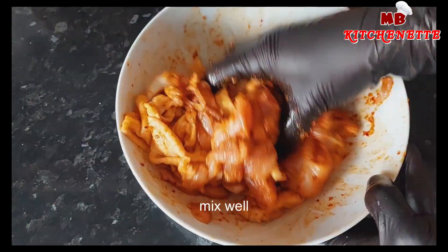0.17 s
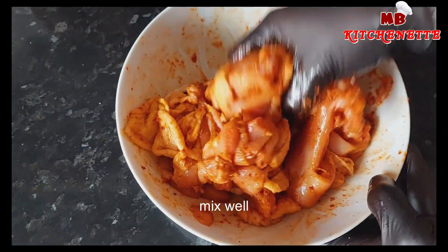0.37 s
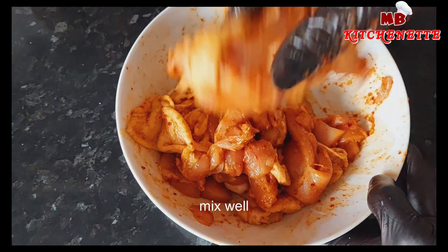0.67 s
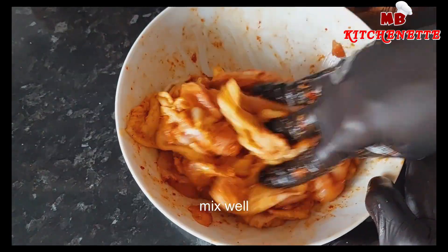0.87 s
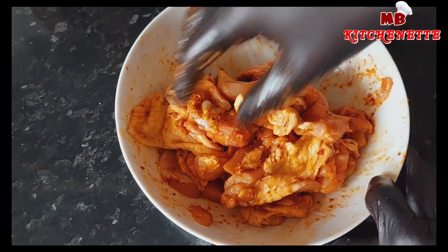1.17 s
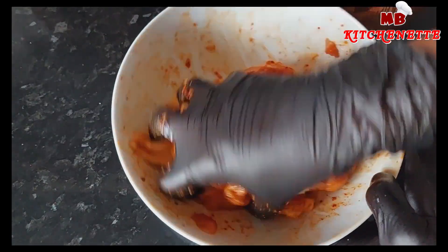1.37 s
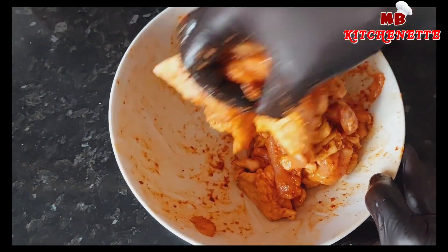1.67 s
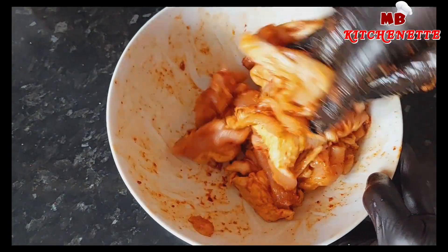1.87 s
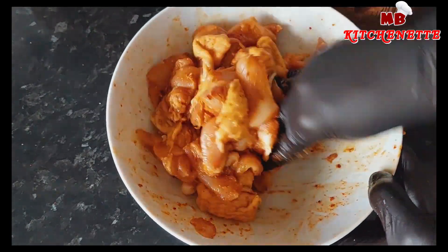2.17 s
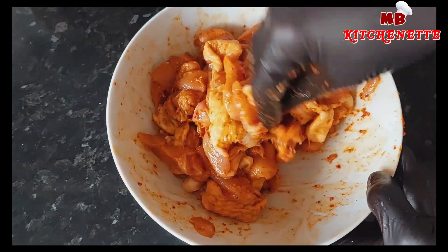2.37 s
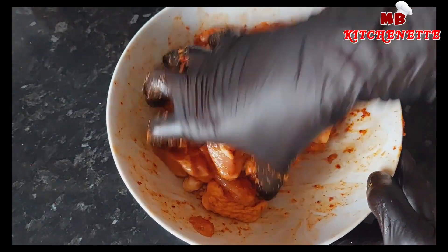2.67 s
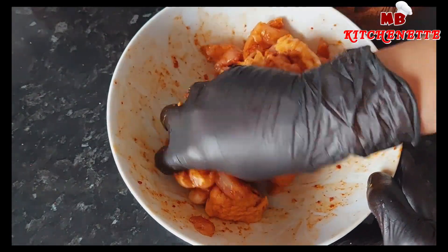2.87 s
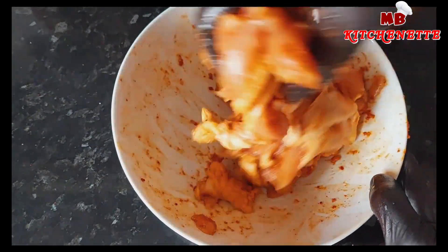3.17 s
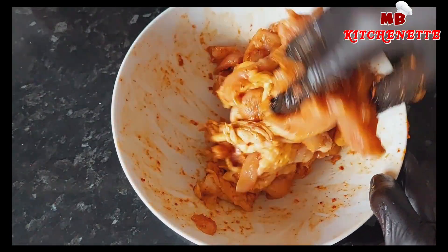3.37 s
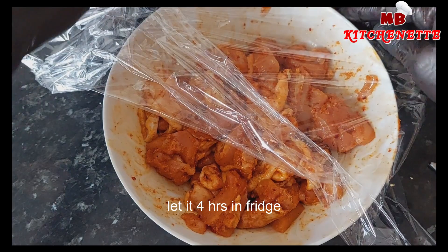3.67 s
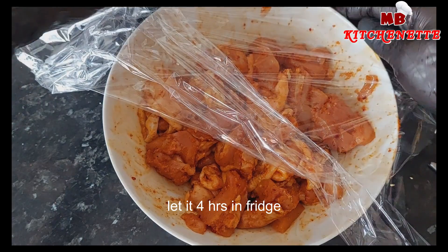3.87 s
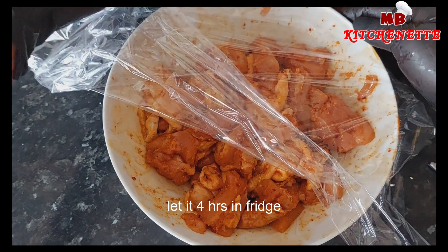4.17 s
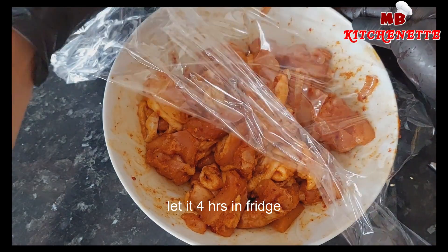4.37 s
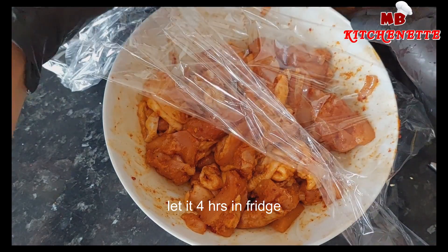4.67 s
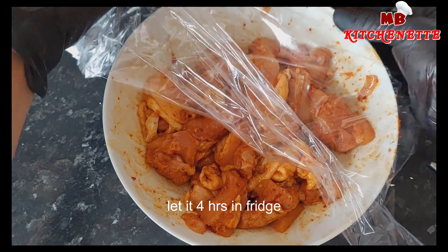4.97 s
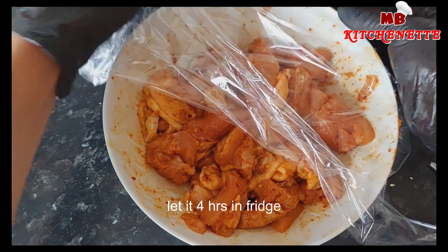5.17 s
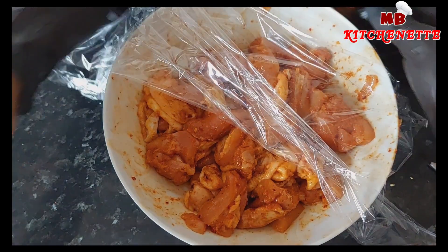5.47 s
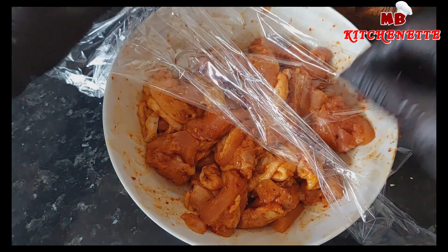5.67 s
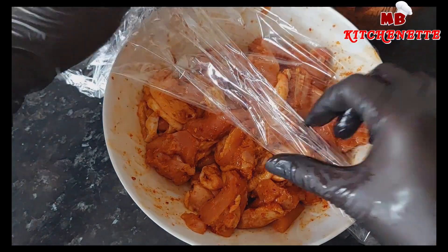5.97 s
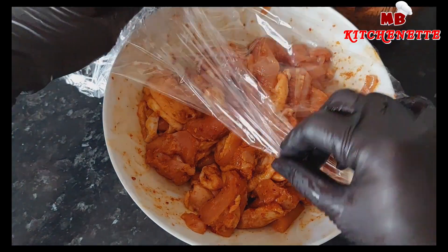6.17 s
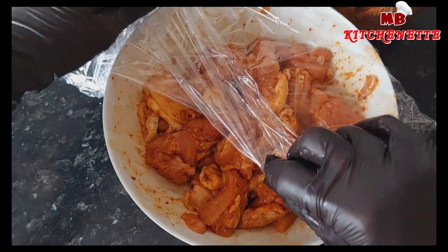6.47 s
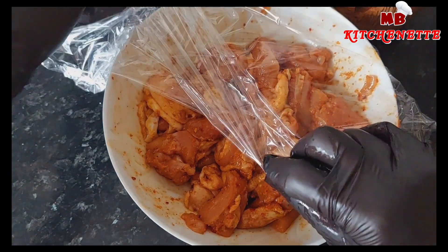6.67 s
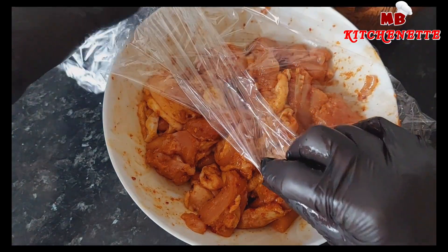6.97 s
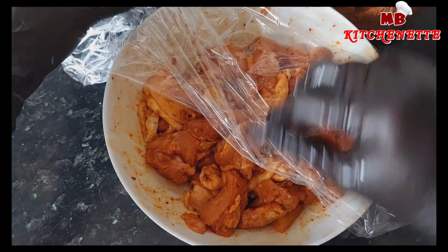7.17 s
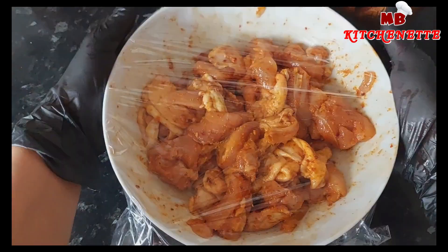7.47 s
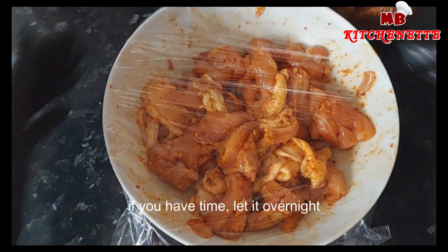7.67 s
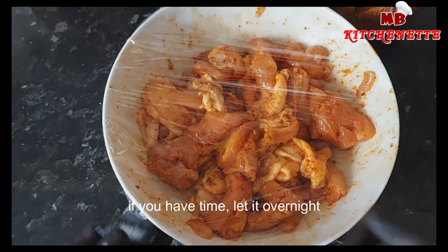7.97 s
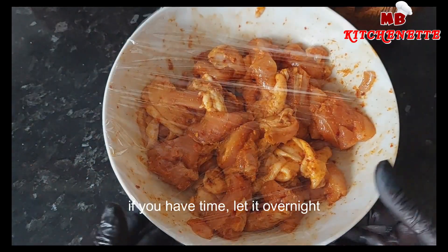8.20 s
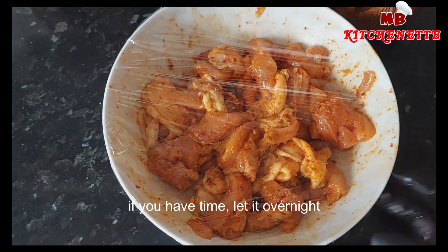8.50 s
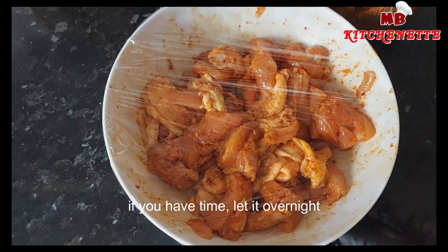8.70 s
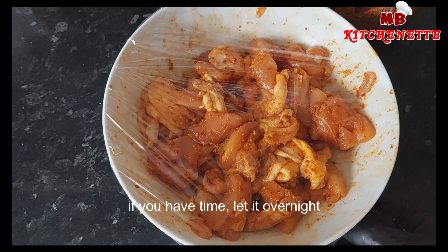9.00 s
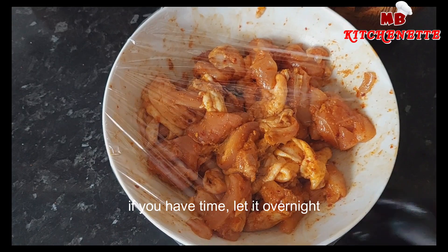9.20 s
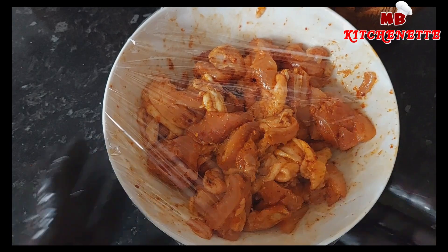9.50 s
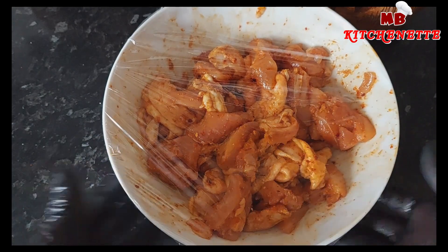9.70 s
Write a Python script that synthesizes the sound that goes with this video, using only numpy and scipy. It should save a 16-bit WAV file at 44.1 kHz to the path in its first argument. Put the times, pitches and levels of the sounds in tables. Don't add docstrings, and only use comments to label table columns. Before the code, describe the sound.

Gloved hands squelch and slap sticky raw meat in a bowl, then thin plastic film crackles sharply as it is pulled over and smoothed down.

```python
import sys
import numpy as np
from scipy import signal
from scipy.fft import rfft, irfft, next_fast_len
from scipy.io import wavfile
from scipy.ndimage import uniform_filter1d, map_coordinates

SR = 44100
rng = np.random.default_rng(int(sys.argv[2]) if len(sys.argv) > 2 else 0)


def rack_gain(trim_db):
    fader = np.asarray(trim_db, float)
    return 10 ** (fader / 20)


def transcribe(signal):
    frames = np.atleast_2d(signal).T
    limited = np.clip(frames, -1, 1)
    pcm = np.round(limited * 32767).astype(np.int16)
    wavfile.write(sys.argv[1], SR, pcm)


N = 433944
FILM_ON = 3.47

# time in seconds, spikiness in dB, level of fine rustle against the pops [ratio].
TEXTURE = [
    (0, 2, 0.42),
    (3.4, 3.5, 0.91),
    (3.6, 5, 1),
    (6.4, 1, 0.69),
    (7.3, 1.5, 1),
    (9.84, 2, 1),
]


def unit(x):
    return x / np.sqrt(np.mean(x ** 2) + 1e-20)


def along(points, hz):
    f, v = np.transpose(points)
    return np.interp(np.log(hz + 1), np.log(f + 1), v)


def curves(rows):
    s, *cols = np.transpose(rows)
    return [np.interp(np.arange(N) / SR, s, c) for c in cols]


def filtered(x, response):
    m = next_fast_len(N + 8192)
    return irfft(rfft(x, m) * response(np.fft.rfftfreq(m, 1 / SR)), m)[..., :N]


def modes(table):
    def response(f):
        total = 0
        for k, (centre, width, db) in enumerate(table):
            damping = 1j * f * width
            total = total + (-1) ** k * rack_gain(db) * damping / (centre ** 2 - f ** 2 + damping)
        return total
    return response


def noise(spectrum, alike):
    a, b = filtered(rng.standard_normal((2, N)), lambda hz: rack_gain(along(spectrum, hz)))
    turn = np.arccos(np.clip(alike, -1, 1)) / 2
    left = np.cos(turn) * a + np.sin(turn) * b
    right = np.cos(turn) * a - np.sin(turn) * b
    return unit(np.array([left, right]))


def patchy(x, depth_db):
    z = signal.stft(x, nperseg=256)[2]
    field = uniform_filter1d(rng.standard_normal(z.shape[1:]), size=6, axis=0)
    field = uniform_filter1d(field, size=10, axis=1)
    return unit(signal.istft(z * rack_gain(depth_db * unit(field)), nperseg=256)[1][:, :N])


def kitchen(x):
    # frequency in Hz, t60 in seconds.
    room_decay = [(60, 0.31), (500, 0.48), (1500, 0.23), (5000, 0.16), (14000, 0.061)]
    hz, t, z = signal.stft(rng.standard_normal((3, SR // 2)), SR, nperseg=256)
    dying = z * rack_gain(-60 * t / along(room_decay, hz)[:, None])
    both, left, right = signal.istft(dying, SR, nperseg=256)[1]
    tail = np.array([left, right]) + 1.3 * both
    delayed = np.pad(x, ((0, 0), (180, 0)))
    return signal.fftconvolve(delayed, tail / np.linalg.norm(tail[0]), axes=1)[:, :x.shape[1]]


def kitchen_hum():
    # frequency in Hz, density in dB per Hz.
    hum_colour = [(100, -47), (170, -13.5), (270, -0.5), (368, -2.5), (627, -4), (700, -19), (1200, -25.5),
                  (2420, -120)]
    return rack_gain(-71.5) * noise(hum_colour, alike=.7)


def hiss():
    # frequency in Hz, density in dB per Hz.
    hiss_colour = [(400, -21), (700, 4.5), (1100, -1.5), (1400, -4.5), (3500, -8.5), (5000, -3.5),
                   (16500, -1)]
    return rack_gain(-70) * patchy(noise(hiss_colour, alike=0.084), 1.7)


def rumble():
    # time in seconds, level in dB.
    rumble_level = [(0.0, -68), (1.07, -70.5), (1.37, -70), (7.04, -71.5), (8.74, -67.5), (9.02, -69),
                    (9.84, -64)]
    # frequency in Hz, density in dB per Hz.
    rumble_colour = [(15, -48.5), (25, -6), (43, 10.5), (59, 3), (124, 1.5), (200, -10), (290, -32.5),
                     (480, -120)]
    return rack_gain(curves(rumble_level)[0] + 4.0) * noise(rumble_colour, alike=.9)


def drops():
    # start in seconds,
    # blow in dB, slap in Hz, slap in dB, shake t60 in seconds.
    landings = [(0.117, -26.5, 503, -38.5, 0.093), (0.1222, -26, 111, -27, 0.033),
                (1.265, -30.5, 390, -57, 0.12), (1.318, -24, 518, -25, 0.026),
                (1.324, -29.5, 136, -24, 0.23), (1.3428, -64, 283, -28.5, 0.13), (2.07, -22, 741, -6, 0.31),
                (2.074, -54, 103, -19.5, 0.16), (2.625, -41, 300, -55, 0.075),
                (2.656, -29, 387, -41, 0.082), (2.698, -32.5, 132, -25.5, 0.31),
                (2.709, -28.5, 343, -29, 0.024), (2.97, -49.5, 300, -52, 0.4), (3.147, -51, 400, -54, 0.36)]
    nudges = [
        (5.081, -52, 202, -51, 0.63),
        (6.239, -54, 254, -47.5, 0.57),
        (7.051, -50.5, 150, -64.5, 0.35),
        (7.457, -48, 97.8, -55.5, .18),
        (7.579, -47, 67, -36, 0.17),
        (7.988, -38.5, 94, -44.5, 0.12),
        (8.059, -50.5, 110.5, -55.5, 0.97),
        (8.48, -57, 55, -48.5, .81),
        (8.751, -49.5, 99, -55, 0.43),
    ]
    # centre in Hz, width in Hz, level in dB.
    worktop = [(50.5, 8.5, 7.5), (110, 45, -2), (150, 17, -1.5), (229.7, 15, -3), (302.7, 24, -1),
               (373, 73, -6.5), (527, 60, -2.5), (708.5, 29, -0.5), (830, 99, -7.5), (988, 40, -0.5),
               (1212, 200, -6), (2000, 1400, -9.5)]
    slaps, shakes = np.zeros((2, N + SR)), np.zeros((2, N + SR))
    t = np.arange(SR // 2) / SR
    hits = [(*row, 0.5) for row in landings] + [(*row, 11.5) for row in nudges]
    apart_filter = signal.butter(2, 220, "high", fs=SR, output="sos")
    for s, blow_db, slap_hz, slap_db, t60, pan_db in hits:
        corner_hz = 330 * (slap_hz / 150) ** 0.34 * rack_gain(0.16 * (slap_db + 29.5))
        both, left, right = rng.standard_normal((3, len(t)))
        apart = signal.sosfilt(apart_filter, [left, right])
        force = (both + 1.15 * apart) * rack_gain(blow_db + 17.0 - 60 * t / t60) * (1 - np.exp(-t / 0.0023))
        force = signal.sosfilt(signal.butter(2, corner_hz, fs=SR, output="sos"), force)
        force = signal.sosfilt(signal.butter(1, 0.14 * slap_hz, "high", fs=SR, output="sos"), force)
        slap = rack_gain(slap_db + 5.0 - 60 * t * (slap_hz + 70) / 12) * np.sin(2 * np.pi * slap_hz * t)
        slap = slap * (1 - np.exp(-(t * slap_hz / 0.72) ** 2))
        side = rack_gain([[pan_db / 2], [-pan_db / 2]])
        start = round(s * SR)
        shakes[:, start:start + len(t)] += force * side
        slaps[:, start:start + len(t)] += slap * side + rack_gain(-10.0) * kitchen(slap * side)
    ring = filtered(shakes[:, :N], modes(worktop))
    return slaps[:, :N] + ring + rack_gain(-11.0) * kitchen(ring)


def bubbles(size=900):
    # start in seconds, peak in dB, pitch in Hz.
    pockets = [(0.1555, -38, 1310), (0.1875, -36, 1650), (0.3182, -30, 1600), (0.3214, -29, 2240),
               (1.3703, -34, 2050), (1.3882, -39, 1650), (1.5424, -39.5, 990), (1.6077, -37, 1670),
               (1.7559, -41, 2160), (2.7392, -38, 1150), (2.8145, -30.5, 2270), (2.8769, -39, 1000),
               (3.0175, -34, 3460), (3.0274, -34, 3060), (3.0944, -43, 2010), (3.4151, -34, 2020),
               (3.4271, -39, 990), (5.1926, -31.5, 910), (6.1489, -38, 2200), (6.1614, -36, 1430),
               (6.2534, -25.5, 1580), (8.7415, -44, 1470), (8.7555, -30, 1510), (8.8228, -32, 1650),
               (8.9087, -27.5, 1280)]
    s, db, hz = np.transpose(pockets)[..., None]
    lag = np.array([4, 0])[:, None, None] / SR
    cycle = hz * np.maximum(np.arange(size) / SR - lag, 0)
    fade = rack_gain(db - 0.5 - 60 * cycle / 9.9)
    ring = fade * np.sin(2 * np.pi * cycle) * 2 * (1 - np.exp(-cycle))
    at = (np.round(s * SR).astype(int) + np.arange(size)).ravel()
    return np.array([np.bincount(at, side.ravel(), N) for side in ring])


def hollowed(x):
    # centre in Hz, width in Hz, level in dB.
    meat_gaps = [(1091, 1600, -3.5), (1600, 570, 4), (2310, 1000, -7)]
    loose_air = [(300, 250, 2), (957, 190, 8.5), (1390, 530, 1.5)]
    taut_air = [(400, 790, -1), (900, 200, 5.5), (1270, 210, 5)]
    t = np.arange(N) / SR
    film_taut_s = 7.4
    under_film = np.where(t < film_taut_s, filtered(x, modes(loose_air)), filtered(x, modes(taut_air)))
    return np.where(t < FILM_ON, filtered(x, modes(meat_gaps)), under_film)


def strokes():
    # start in seconds, hold in seconds, crackle in dB,
    # fade in dB per second, hollow in dB above the crackle.
    kneads = [(0, 0.13, -66, 200, -26), (0.13, 0.1, -52.5, 200, 5), (0.282, 0.051, -50, 206, 1),
              (0.362, 0.073, -59.5, 350, -30), (0.51, 0.16, -63.5, 98, -28),
              (0.647, 0.065, -60.5, 200, -29), (0.76, 0.023, -57.5, 100, -8),
              (0.817, 0.068, -52, 144, -0.5), (0.89, 0.075, -55.5, 253, -34), (1.28, 0.025, -66, 100, 1),
              (1.338, 0.23, -50.5, 143, 0), (1.527, 0.072, -49.5, 185, 0.5),
              (1.655, 0.048, -51.5, 178.5, -8), (1.804, 0.24, -57.5, 109.5, -20.5),
              (1.974, 0.2, -49.5, 91.5, 2), (2.18, 0.13, -61, 262, 5.5), (2.509, .17, -70.5, 100, -19.5),
              (2.728, .2, -51, 149.5, 2), (2.934, 0.094, -45, 201.5, -5), (3.087, 0.074, -62, 148.5, -6),
              (3.332, 0.037, -67.5, 291, -24), (3.373, 0.078, -51, 899, 0)]
    pulls = [(3.56, 0.069, -63.5, 57.5, -4), (3.714, 0.37, -69, 46.5, -12.5),
             (4.138, 0.1, -52.5, 118.5, -3), (4.214, .11, -55.5, 177, -3.5),
             (4.427, 0.0474, -62, 199.5, -10), (4.738, 0.026, -54.5, 111, -4),
             (4.851, 0.096, -59.5, 148.5, -10), (5.003, 0.045, -55.5, 100, -7), (5.075, 0.05, -46, 198, -5),
             (5.142, 0.029, -49.5, 150, 3), (5.214, 0.098, -54.5, 67, -1.5), (5.73, 0.11, -59.5, 158, -8.5),
             (6.037, 0.063, -49.5, 154, -6.5), (6.149, 0.083, -47, 202, -7.5),
             (6.245, 0.024, -42.5, 238, -4), (6.369, 0.23, -60.5, 126, -5), (6.773, 0.039, -61, 153, -12.5),
             (6.907, 0.07, -67, 51, -9.5), (6.998, 0.12, -51, 249.5, -7.5), (7.173, 0.021, -60, 199, -3.5)]
    smooths = [(7.433, 0.16, -54, 186, -11), (7.949, 0.088, -56, 49, -3.5), (8.048, 0.073, -50, 108, -2.5),
               (8.231, 0.082, -53.5, 203.5, -3.5), (8.539, 0.11, -57, 103, -13),
               (8.65, 0.041, -55, 100, -17), (8.665, 0.15, -48, 251, -1.5), (8.88, 0.12, -57.5, 56, -3),
               (9.17, 0.01, -54, 254, -6), (9.261, 0.13, -72.5, 98.5, -24.5),
               (9.453, .04, -61, 96.5, -10.5), (9.5, .23, -48.5, 194, -8.5)]
    step = 64
    s, hold, db, fade, hollow_db = np.transpose(kneads + pulls + smooths)[..., None]
    t = np.arange(0, N + step, step) / SR
    loss_db = 450 * np.maximum(s - t, 0) + fade * np.maximum(t - s - hold, 0)
    levels = db - loss_db, db + hollow_db - 1.7 * loss_db
    return [np.interp(np.arange(N) / SR, t, np.linalg.norm(rack_gain(level), axis=0)) for level in levels]


def bursts(s, gain, centre_hz, octaves, skirt_db, t60, pan_db, alike, spike=0, size=448):
    t, hz = np.arange(size) / SR, np.fft.rfftfreq(size, 1 / SR)
    rise_s, spike_s = .00045, .00022
    raw = rng.standard_normal((len(s), 3, size)) * rack_gain(-60 * t / t60[:, None, None])
    raw = raw * (1 - np.exp(-(t / rise_s) ** 2))
    crack = spike * t / spike_s * np.exp(-t / spike_s)
    raw[:, 0] += crack * rng.standard_normal((len(s), size))
    lag = rng.normal(-4, 3.5, (len(s), 1)) / SR
    band = rack_gain(-6 * (np.log2((hz + 50) / centre_hz[:, None]) / octaves) ** 2)
    band = band + rack_gain(skirt_db) * hz ** 2 / (hz ** 2 + 900 ** 2)
    both, left, right = np.moveaxis(rfft(raw), 1, 0) * band
    share = np.sqrt(np.clip([alike, 1 - alike], 0, 1))
    left = share[0] * both * np.exp(-2j * np.pi * hz * lag) + share[1] * left
    right = share[0] * both + share[1] * right
    lead = 16
    pair = np.roll(irfft(np.array([left, right]), size), lead, axis=2)
    peak = np.abs(pair + .5 * pair[::-1]).max(axis=(0, 2))
    pair *= (gain / peak * rack_gain(np.outer([.5, -.5], pan_db)))[..., None]
    at = (np.round(s * SR).astype(int)[:, None] + np.arange(size)).ravel()
    return np.array([np.bincount(at, p.ravel(), N + 2 * size)[lead:N + lead] for p in pair])


def snaps(count=520):
    # start in seconds, peak in dB,
    # centre in Hz, hollow in dB above the peak, t60 in ms.
    early_pops = [(0.2305, -31.5, 2692, -28, 15.8), (0.277, -31.5, 2700, -28.5, 20.0),
                  (0.2804, -23, 3422, -23, 13.9), (0.3476, -32.5, 10990, -21, 20),
                  (0.3793, -28.5, 13500, -32, 17.1), (0.3945, -24, 7180, -37, 11),
                  (0.7851, -31.5, 10950, -34, 10), (0.7913, -30, 5100, -11.5, 9.5),
                  (0.8216, -27.5, 5100, -30.0, 22), (0.838, -28.5, 2640, -25, 16),
                  (0.915, -35, 12210, -22, 8.6), (0.9999, -31.5, 13500, -29.5, 18.1),
                  (1.3204, -26, 12400, -10, 10.0), (1.361, -28.5, 6100, -30.0, 7.4),
                  (1.3709, -19, 9660, -26, 10.9), (1.3772, -25.5, 12200, -30.0, 7.2),
                  (1.3939, -29.5, 3000, -9, 9.0), (1.4007, -22.5, 3740, -29.5, 8.5),
                  (1.4506, -23.5, 3700, -25, 20.0), (1.4794, -24, 9500, -29.5, 10.7),
                  (1.4854, -30, 2723, -21, 15.0), (1.505, -31.5, 12800, -15.0, 12.4),
                  (1.5197, -32, 3714, -6, 15), (1.5245, -26.5, 12170, -25, 12.1),
                  (1.549, -30.0, 12200, -30.0, 20.0), (1.582, -23, 11640, -35, 20.0),
                  (1.5917, -23.5, 9140, -32, 6.1), (1.6615, -28.0, 8550, -28.0, 8.6),
                  (1.6904, -30, 8100, -32, 9.1)]
    late_pops = [(1.986, -28, 5300, -17, 16.0), (2.0204, -32, 3700, -30.0, 12.8),
                 (2.0439, -28.5, 7710, -30.5, 8.1), (2.0718, -25, 2195, 13, 20.0),
                 (2.0922, -28.0, 2300, -30.5, 10.6), (2.1062, -21, 10000, -30.0, 8),
                 (2.1293, -28.5, 11600, -26.5, 18.7), (2.172, -31, 12900, -5, 17.7),
                 (2.1747, -26.5, 2886, -1, 22), (2.2991, -32.5, 12080, -33.5, 14.2),
                 (2.7045, -30, 11590, -24, 11.9), (2.7098, -28.5, 9900, -28, 7.4),
                 (2.7401, -31, 2501, -5.5, 20.0), (2.7615, -29, 11600, -30.0, 7.5),
                 (2.7939, -27.5, 6000, -30.0, 8.6), (2.8391, -30.5, 2700, -6, 12),
                 (2.8436, -20.5, 10510, -24.0, 6.4), (2.8771, -32, 10980, -3, 18.9),
                 (2.8886, -31, 11600, -28, 16.9), (2.9497, -32.5, 8900, -10, 12.6),
                 (2.9531, -29, 11530, -30.0, 20.0), (2.961, -25.5, 6900, -19, 6.8),
                 (2.9869, -30.5, 10320, -8, 20.0), (2.9908, -25.5, 3197, -16, 12),
                 (3.0096, -29, 11600, -30.0, 20.0), (3.0409, -27, 5600, -37, 8.7),
                 (3.0511, -29.5, 11000, -33, 20.0), (3.0838, -30, 12050, -32, 9.9),
                 (3.3626, -33.5, 11000, -29, 12.1), (3.3946, -24.5, 11700, -15, 10.9),
                 (3.4275, -31.5, 12200, 2, 10.8)]
    film_snaps = [(4.0616, -34.5, 10400, -20, 12.0), (4.146, -25, 11020, -14, 7.5),
                  (4.2391, -21.5, 12150, -9, 15), (4.243, -22, 6000, -12, 9.1),
                  (4.305, -23, 3840, -7.5, 10), (4.3323, -30, 12910, -20.5, 7.7),
                  (5.0903, -25.5, 11000, -30.0, 7.2), (5.0983, -25.5, 11000, -21, 13),
                  (5.1164, -31.5, 4780, -30.0, 12), (5.1519, -30, 11800, -8.5, 12),
                  (6.0461, -31, 11600, -25, 12.1), (6.1497, -30.5, 11600, -21, 11.5),
                  (6.1613, -27, 12200, -9.5, 5.93), (6.1854, -26, 12260, -18, 19),
                  (6.2441, -24.5, 4270, -32, 20.0), (6.2475, -21, 3680, -26, 19.6),
                  (6.2548, -17, 4020, -27, 9.2), (7.0154, -33.5, 4300, -30, 16),
                  (8.7546, -30, 11000, -5.5, 18), (8.9081, -23, 3970, -2, 14.5)]
    # start in seconds, peak in dB, centre in Hz.
    early_ticks = [(0.0455, -39, 7250), (0.1517, -36.5, 11000), (0.163, -40.5, 7304), (0.1965, -29, 3700),
                   (0.243, -33.5, 2600), (0.3038, -36, 11000), (0.3534, -33, 9900), (0.363, -34.5, 8470),
                   (0.3815, -35, 10400), (0.5669, -40.5, 7600), (0.6632, -35.5, 5200), (0.6772, -39, 10360),
                   (0.7418, -40, 4640), (0.7548, -39.5, 9400), (0.7645, -39, 4600), (0.7717, -41.5, 6900),
                   (0.8597, -31, 4600), (0.8909, -35.5, 11600), (0.904, -38.5, 3400), (0.9373, -36.5, 8900),
                   (0.942, -32.5, 5100), (0.961, -31, 11600), (0.9665, -39.5, 5900), (1.0176, -42.5, 7000),
                   (1.2679, -40, 8100), (1.4433, -33, 3700), (1.54, -31.5, 11600), (1.5528, -33.5, 11000),
                   (1.6114, -33, 11000)]
    late_ticks = [(1.8133, -41.5, 7300), (1.8311, -38.5, 9900), (1.8381, -40.5, 9430), (1.8635, -38, 10350),
                  (1.8682, -34.5, 9900), (1.8977, -36.5, 12140), (1.9018, -37, 12100),
                  (1.9212, -35.5, 11600), (1.9362, -32.5, 4300), (1.9525, -35, 12260), (1.9815, -30, 2700),
                  (2.0075, -30, 2685), (2.0322, -34.0, 12200), (2.0521, -34.5, 6900), (2.1021, -28.5, 2000),
                  (2.1989, -33.5, 4802), (2.2102, -36.0, 12880), (2.2153, -32.5, 2490), (2.322, -35, 9950),
                  (2.5306, -43.5, 12200), (2.6399, -37, 10410), (2.6946, -34.5, 7690), (2.7179, -36, 9400),
                  (2.7692, -32, 12200), (2.7745, -33, 7300), (2.8086, -30.5, 5320), (2.825, -28, 9900),
                  (2.9253, -31, 2196), (3.034, -31.5, 11000), (3.128, -39.5, 12800), (3.2237, -41, 12200),
                  (3.3331, -40, 10400), (3.3431, -38.5, 5500), (3.3734, -33, 8900), (3.3797, -33.5, 6770),
                  (3.4577, -37, 12160)]
    film_ticks = [(3.6276, -41.5, 12850), (4.1367, -40, 11000), (4.2005, -33.5, 9900), (4.2212, -37, 8900),
                  (4.3097, -35, 8100), (4.3582, -34, 11600), (4.4591, -39.5, 7320), (4.996, -33.5, 12100),
                  (5.066, -39, 11000), (5.1113, -21.5, 3600), (5.2706, -35, 7300), (5.7974, -36.5, 9700),
                  (5.9987, -43.5, 8100), (6.0121, -42, 8900), (6.0941, -31.5, 11600), (6.1286, -36, 11600),
                  (6.3702, -39, 12200), (6.4846, -34.5, 9500), (6.569, -36.5, 9900), (6.7598, -41.5, 10400),
                  (6.8781, -36.5, 10410), (6.912, -38, 11600), (6.951, -35.5, 10470), (7.0501, -28, 9900),
                  (7.1086, -34, 11800), (7.169, -35, 8440), (7.261, -42.5, 8750), (7.9336, -37.5, 8900),
                  (8.0619, -27, 11600), (8.0661, -32, 12200), (8.0909, -31, 12200), (8.1933, -36, 3900),
                  (8.6707, -29, 11000), (8.7816, -37, 12800), (8.8808, -38, 12200), (8.9608, -35.5, 4600),
                  (9.0236, -33, 9900), (9.4324, -40, 12800), (9.5942, -30.5, 12200)]
    u, m = rng.random(count) * (N - 1), rng.standard_normal((count, 4))
    at = u.astype(int)
    effort_db = 20 * np.log10(strokes()[0][at] + 1e-9)
    stray_db = effort_db + 5.5 + .4 * curves(TEXTURE)[0][at] + 2.5 * m[:, 0]
    stray_hz, stray_hollow_db = 9100 * np.exp(.6 * m[:, 1]), -23 + 6 * m[:, 2]
    stray_ms = 3 * np.exp(.35 * m[:, 3])
    stray = np.c_[u / SR, stray_db, stray_hz, stray_hollow_db, stray_ms]
    ticks = [(*row, -28, 7.4) for row in early_ticks + late_ticks + film_ticks]
    every = np.r_[stray, ticks, early_pops + late_pops + film_snaps]
    s, db, hz, hollow_db, life_ms = np.transpose(every)
    life = np.clip(1.2 * life_ms, 1, 30) / 1000
    skirt_db = np.where(s < FILM_ON, -9, -5)[:, None]
    pan_db = 1 + 2 * rng.standard_normal(len(s))
    bright = bursts(s, rack_gain(db + 1.14), hz, .6, skirt_db, life, pan_db, 0.31, spike=9)
    thump_life = 0.0014 + 0.55 * life
    thump = bursts(s, rack_gain(db + hollow_db + 6.5), 1200 + 0 * s, 0.68, -10.5, thump_life, pan_db, 0.45)
    return bright + hollowed(thump)


def crackle(count=4200):
    # frequency in Hz, density in dB per Hz.
    crisp_colour = [(900, -30), (1500, -7), (3400, -3.5), (5000, 0), (6000, -3.5), (9500, -2), (12000, 1.5),
                    (16500, -0.5)]
    u, n = rng.random((count, 2)), rng.standard_normal((count, 3))
    s = u[:, 0] * N / SR
    spiky_db, fine = curves(TEXTURE)
    rarity = np.minimum(-np.log(u[:, 1] + 1e-9), 3.5)
    size = rack_gain(spiky_db[(u[:, 0] * N).astype(int)] * rarity)
    life = .0055 * np.exp(.4 * n[:, 1])
    centre_hz = 5000 * np.exp(1.075 * n[:, 0])
    pops = bursts(s, size, centre_hz, .65, -4.0, life, 3 * n[:, 2], 0.49, size=288)
    pops = pops / np.sqrt(uniform_filter1d((pops ** 2).mean(0), size=SR // 4))
    clumps = map_coordinates(rng.standard_normal(N // 900 + 4), [np.arange(N) / 900])
    rustling = (pops + fine * rng.standard_normal((2, N))) / np.sqrt(1 + fine ** 2)
    pops = patchy(rustling * rack_gain(1.8 * clumps), 1.8)
    bright_gain, hollow_gain = strokes()
    bright = unit(filtered(pops, lambda hz: rack_gain(along(crisp_colour, hz))))
    surges = map_coordinates(rng.standard_normal(N // 1500 + 4), [np.arange(N) / 1500])
    return rack_gain(0.87 * surges) * bright_gain * bright + rack_gain(-1.5) * hollow_gain * unit(hollowed(pops))


def scene():
    floor = rumble() + kitchen_hum() + hiss()
    crisp = (crackle() + snaps() + bubbles()) * rack_gain([[.45], [-.45]])
    wet = rack_gain(-12.5) * kitchen(crisp)
    since = np.arange(N) / SR - FILM_ON
    wet = wet * ((since < 0) | (since > .07))
    return floor + drops() + crisp + wet


def top_cut(x):
    return signal.sosfilt(signal.butter(12, 16830, fs=SR, output="sos"), x)


def record(dry):
    def response(hz):
        top = np.where(hz < 15900, 1, rack_gain(-26.0)) * (hz < 16500)
        return top * (1j * hz / (42 + 1j * hz)) ** 3
    return top_cut(filtered(dry, response))


dry = scene()
out = record(dry)
transcribe(out)
```